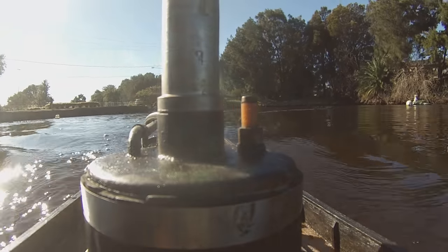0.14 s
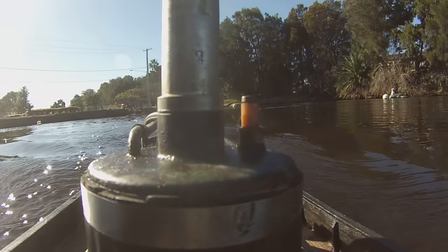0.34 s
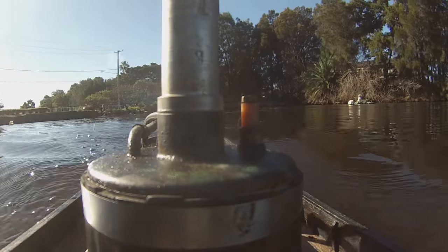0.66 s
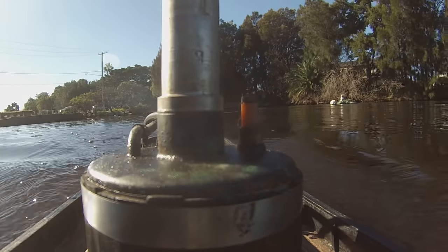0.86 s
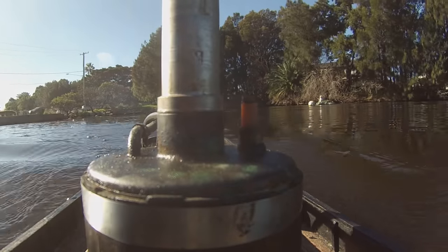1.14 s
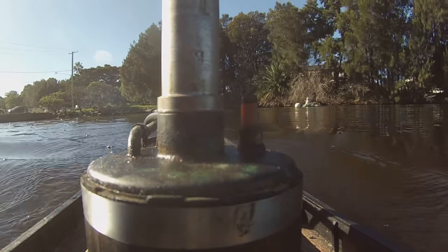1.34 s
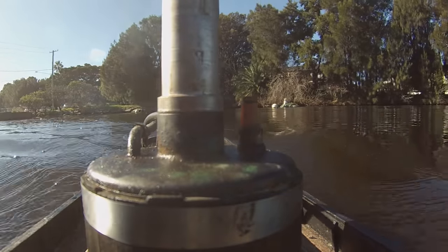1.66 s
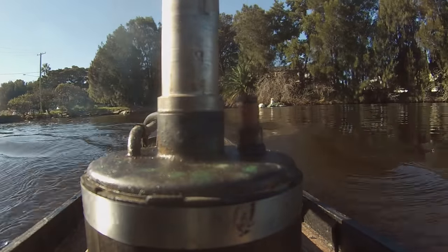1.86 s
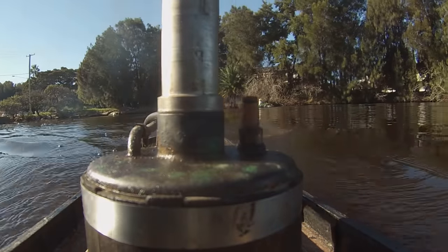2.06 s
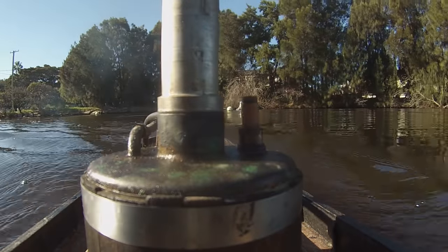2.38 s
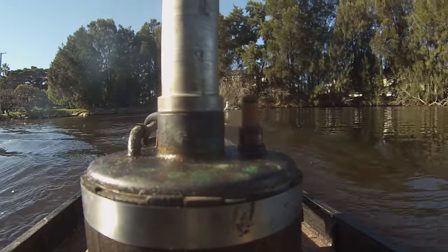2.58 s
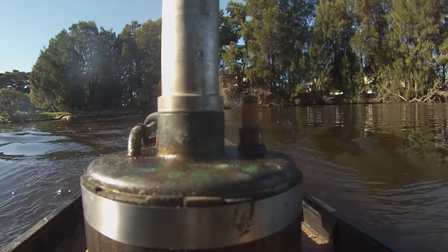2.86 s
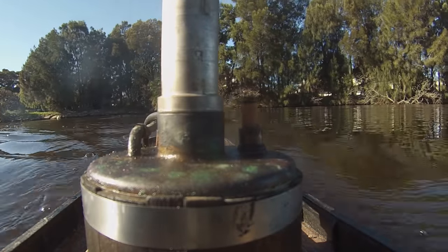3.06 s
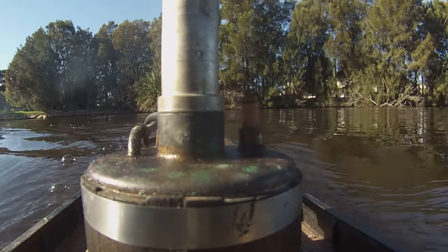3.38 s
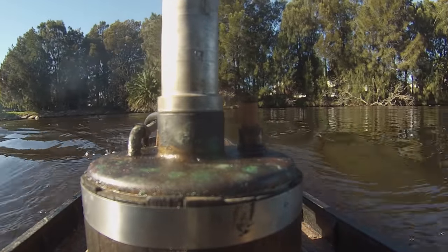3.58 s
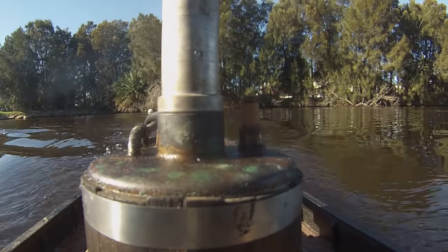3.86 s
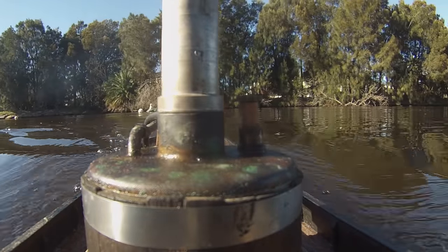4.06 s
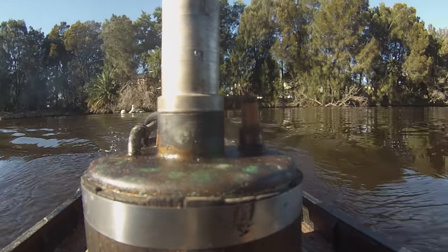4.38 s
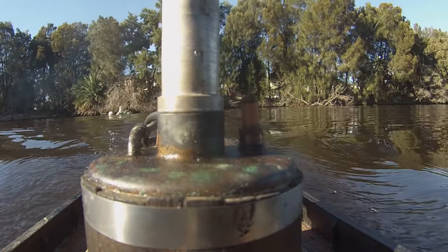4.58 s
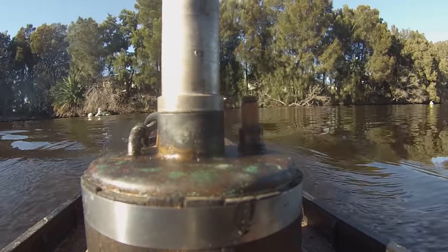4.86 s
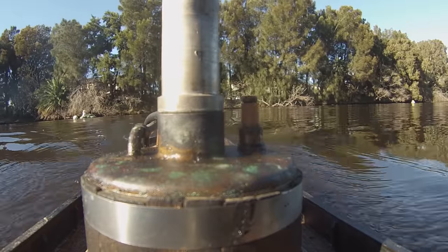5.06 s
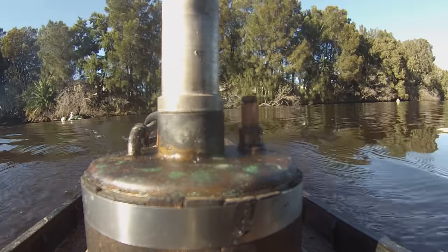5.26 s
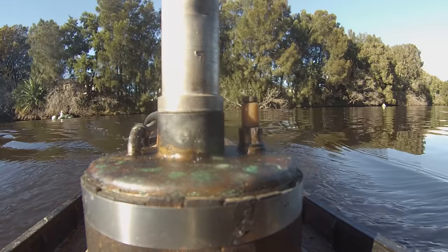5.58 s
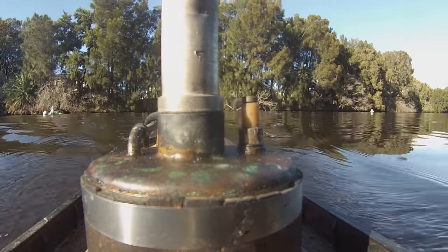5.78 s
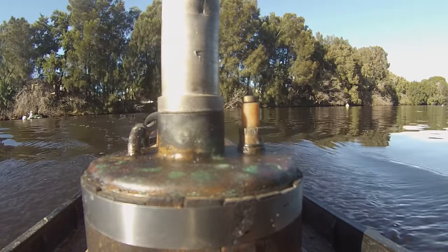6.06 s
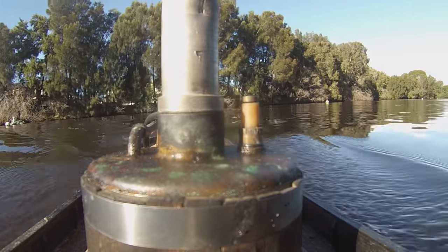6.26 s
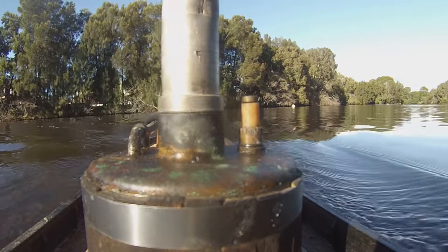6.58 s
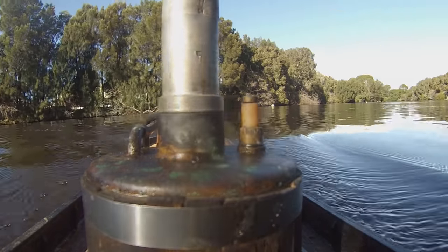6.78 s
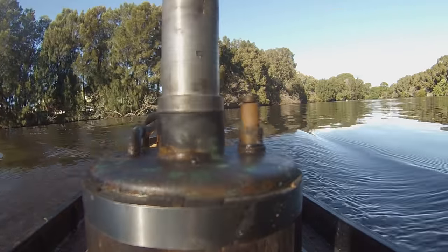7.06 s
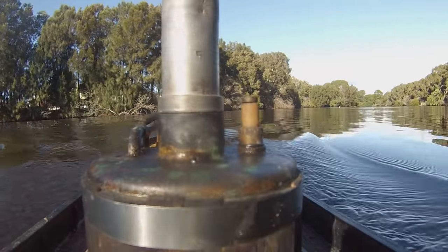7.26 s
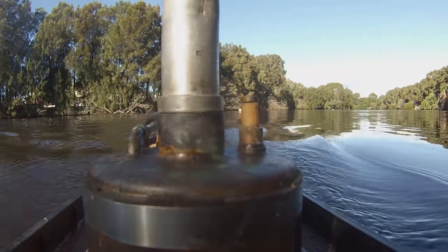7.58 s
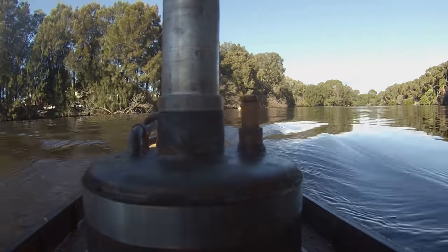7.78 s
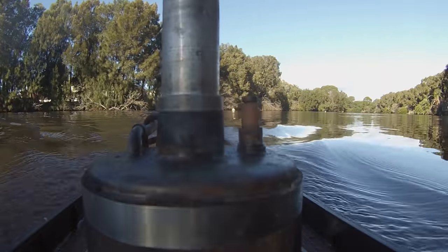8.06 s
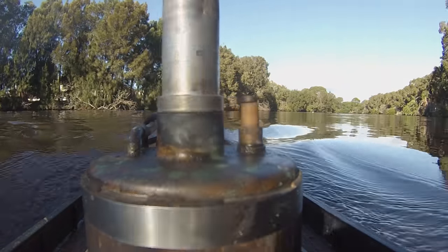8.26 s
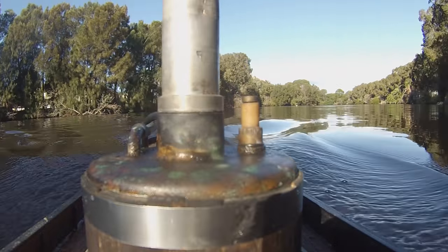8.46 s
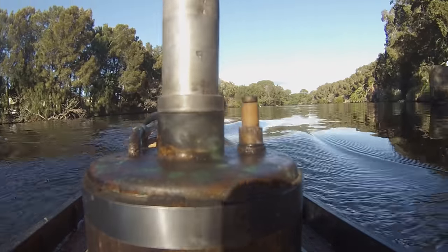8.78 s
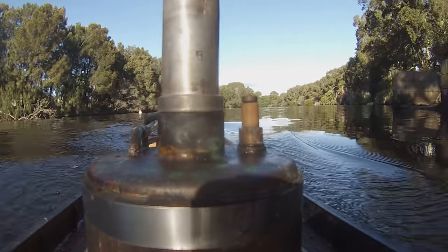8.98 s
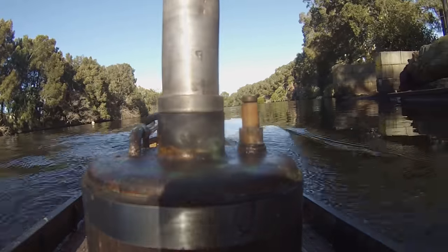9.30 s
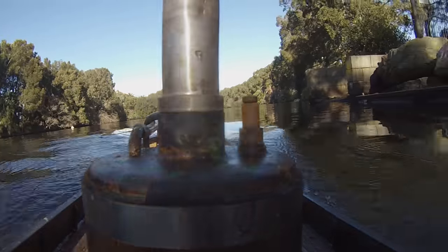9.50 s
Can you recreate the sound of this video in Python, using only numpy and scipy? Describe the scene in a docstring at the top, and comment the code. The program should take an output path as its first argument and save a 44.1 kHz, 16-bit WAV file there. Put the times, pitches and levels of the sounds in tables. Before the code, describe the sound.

Heard through the hull of a model steam boat on a river, the little engine makes a loud, low, even drone from start to finish. The planking, deck and boiler buzz with a fast metallic rattle and a steady ringing whine, over the soft, rapid thumping of a slack bearing. Small knocks come now and then, singly or in clusters, while a faint low rumble of water lies beneath.

```python
"""Aboard a model steam tug.

The microphone is fixed to the boat and hears its small double-acting engine through the structure.
Two strokes a turn shake the hull into a deep hum; steam and rattle, pulsed by the crank, ring
planking, deck and boiler shell. Propeller load slows the crank and swells the hum. A slack bearing
thumps, loose parts knock, and water rumbles along the hull underneath it all."""
import sys
import numpy as np
from scipy import signal
from scipy.io import wavfile
from scipy.ndimage import uniform_filter1d

SR = 44100
rng = np.random.default_rng(int(sys.argv[2]) if len(sys.argv) > 2 else 0)


def transcribe(signal):
    """Save signal, clipped to [-1, 1], as a 16-bit WAV file at the path in sys.argv[1]."""
    frames = np.atleast_2d(signal).T
    limited = np.clip(frames, -1, 1)
    pcm = np.round(limited * 32767).astype(np.int16)
    wavfile.write(sys.argv[1], SR, pcm)


N = 424683

# Load on the propeller. Each row: time in seconds, rise of the hum in dB (0 is even load).
PROPELLER_LOAD = [(0.0, -0.18), (0.35, -2.3), (0.49, -0.5), (0.82, -1.85), (0.98, 0.5), (1.07, -1.22),
                  (2.05, 0.0), (2.55, -0.68), (3.05, -0.9), (3.13, 0.0), (3.9, -0.85), (4.08, 0.2),
                  (4.32, -0.63), (4.85, -0.53), (5.32, 0.5), (5.75, 0.6), (5.9, 1.58), (6.15, -1.55),
                  (6.3, -0.5), (7.2, -0.5), (7.32, 1.8), (7.7, 0.24), (7.82, 1.4), (7.95, 0.5), (8.4, 0.16),
                  (8.9, -1.64), (9.25, -0.96), (9.4, -0.2), (9.63, 0.4)]
# The engine's slow drift at even load. Each row: time in seconds, strokes per second,
# level of the hum's octave in dB.
ENGINE_DRIFT = [(0, 49.28, -32.0), (2, 49.41, -31.3), (4, 49.56, -30.0), (6, 49.77, -28.8),
                (7.2, 49.88, -29.7), (8.2, 49.64, -28.2), (9, 49.78, -29.4), (9.63, 50.83, -31.1)]
# Weaker tones from rod and crank. Each row: multiple of the crank speed, level in dB, polarity,
# wobble in dB, share of the octave's swell.
CRANK_ORDERS = [(1, -42, -1, 2, -0.073), (3, -34, -1, 0.7, 0.76), (5, -37.5, -1, 0.8, 0.11),
                (6, -43, -1, 2, 0.93), (7, -46.5, -1, 1.5, 0.95), (8, -39, -1, 0.87, .25),
                (9, -48, 1, 2, -0.94), (10, -53.5, -1, 3, -0.2), (11, -57.5, -1, 4.5, -0.36)]

# Resonances of the boat's three parts; neighbours of like polarity cancel in a notch between them.
# Each row: frequency in Hz, width in Hz, relative gain in dB, polarity.
PLANKING_MODES = [(305, 69, -3, 1), (342, 79.5, -0.16, -1), (431, 49.3, 0.0, 1), (552, 177, -13, -1),
                  (702, 42, -15.5, -1), (870, 227, -18, 1)]
DECK_MODES = [(983.5, 74.4, -4.5, -1), (1137, 82, -6.5, 1)]
BOILER_MODES = [(1311, 102, -18.6, -1), (1467, 126, -13.2, 1), (1767, 176, -18.5, 1), (1858, 86, -5.4, -1),
                (1945, 45, -16.0, 1), (2033, 60, -12.6, 1), (2220, 124, -21.4, -1), (2455, 90, -30.0, 1),
                (2784, 403, -32.9, 1), (2998, 97, -32.9, 1), (3300, 84, -25.7, -1), (3680, 139, -18.4, 1),
                (4210, 403, -31.5, -1), (4900, 195, -31.7, -1), (5330, 109, -35.6, 1),
                (5850, 244, -27.7, -1), (7000, 960, -38.2, 1), (7800, 641, -38.3, -1),
                (9370, 935, -41.7, 1), (11330, 1334, -47.2, -1), (12870, 1085, -53.1, 1)]
# How the crank pulses each part's rattle. Each holds: quietest crank angle in turns, swing per turn
# in dB, swing per stroke in dB, narrowness of the pause, flicker in dB.
PLANKING_PULSE = (.37, .6, 1.7, .1, 1.1)
DECK_PULSE = (.43, -.2, 3.0, -.25, 1.2)
BOILER_PULSE = (.315, .8, 2.8, .45, .8)

# The loudest knocks of loose parts. Each row: start in seconds, level in dB,
# part struck (0 planking, 1 deck, 2 boiler).
LOOSE_KNOCKS = [(0.161, -22, 1), (1.556, -25, 0), (1.749, -21, 0), (1.829, -21, 2), (1.983, -22, 1),
                (2.023, -19, 1), (2.727, -17, 0), (2.889, -18, 0), (2.974, -20, 1), (3.151, -23, 0),
                (4.135, -18, 1), (4.282, -20, 0), (4.477, -22, 1), (4.839, -17.5, 2), (6.089, -16, 1),
                (6.123, -17.5, 0), (6.165, -23, 2), (6.345, -18, 0), (7.383, -18.5, 1), (7.57, -19, 1),
                (8.139, -18, 1), (8.181, -20, 1), (8.383, -20, 1), (8.637, -24, 0)]
# Water along the hull. Each row: centre in Hz, width of one filter pass in Hz, level in dB.
WATER_BANDS = [(39.7, 10, -43), (65, 51, -46), (124, 91, -47), (196, 126, -48.5)]

HUM_DB, RATTLE_DB = -12, -27.5  # the hum at even load; the rattle before its low cut
MOUNT_HZ, MOUNT_WIDTH_HZ = 192, 27  # the engine mount delays the orders near its resonance


def engine():
    """Load slows the crank and swells the octave. Gives crank angle in turns, load and octave in dB."""
    t = np.arange(N) / SR
    hunting = wander(14)
    hunting -= uniform_filter1d(hunting, SR // 4)  # a slow stroke is soon made up
    load_db = np.interp(t, *np.transpose(PROPELLER_LOAD)) + 0.44 * hunting / hunting.std()
    times, even_hz, even_octave_db = np.transpose(ENGINE_DRIFT)
    stroke_hz = np.interp(t, times, even_hz) - 0.65 * load_db
    turns = 0.096 + np.cumsum(stroke_hz) / (2 * SR)
    labour_db = 1.05 * np.maximum(load_db, 0)  # further swell above even load
    octave_db = np.interp(t, times, even_octave_db) + 1.85 * load_db + labour_db
    return turns, load_db, octave_db


def piston_hum(turns, load_db, octave_db):
    """The piston shakes the hull twice a turn; rod and crank add orders locked to the same turn."""
    angle = 2 * np.pi * turns
    crank_hz = (turns[-1] - turns[0]) * SR / N
    swell_db = octave_db - octave_db.mean()
    hum = undb(HUM_DB + load_db + 0.12 * wander(22)) * np.cos(2 * angle)
    hum -= undb(octave_db + 0.8 * wander(14)) * np.cos(4 * angle)
    for multiple, db, polarity, wobble_db, share in CRANK_ORDERS:
        gain = polarity * undb(db + share * swell_db + wobble_db * wander(5))
        hz = multiple * crank_hz
        mount_lag = 2 * np.arctan2(MOUNT_WIDTH_HZ * hz, MOUNT_HZ ** 2 - hz ** 2)
        phase_wobble = 0.12 * wobble_db * wander(5)
        hum += gain * np.cos(multiple * angle - mount_lag + phase_wobble)
    return np.sqrt(2) * hum


def steam_rattle(turns, pulse, modes):
    """Dense small knocks and steam hiss ring one part of the boat, easing as the piston reverses."""
    quiet_turn, turn_db, stroke_db, narrowness, flicker_db = pulse
    angle = 2 * np.pi * (turns - quiet_turn)
    skew = 0.22 * np.sin(2 * angle) * (1 - np.cos(2 * angle))  # the push sets in faster than it fades
    pause = np.cos(2 * angle) + narrowness * np.cos(4 * angle) - skew
    force_db = -turn_db * np.cos(angle) - stroke_db * pause + flicker_db * wander(160)
    grain_db = 0.92 * rng.exponential(size=N)  # some contacts are much harder than the rest
    force = undb(force_db + grain_db) * rng.standard_normal(N)
    return ring(force / force.std(), modes)


def loose_knocks(spread_db=-10.5):
    """A loose part strikes planking, deck or boiler; the other two ring more faintly."""
    times, blow_db, struck = np.transpose(LOOSE_KNOCKS)
    return sum(blows(times, blow_db + spread_db * (struck != part), modes)
               for part, modes in enumerate((PLANKING_MODES, DECK_MODES, BOILER_MODES)))


def bearing_slap(turns, level_db=-30, scatter_db=0.5):
    """The crank bearing takes up its slack once a turn and thumps the planking."""
    slap_turns = np.arange(1, int(turns[-1])) - 0.1
    times = np.interp(slap_turns, turns, np.arange(N) / SR)
    peaks_db = level_db + scatter_db * rng.standard_normal(len(times))
    return blows(times, peaks_db, PLANKING_MODES)


def water_rumble():
    """Water runs along the hull: low, slowly wavering noise under the hum."""
    rumble = 0
    for hz, width, db in WATER_BANDS:
        peak = signal.iirpeak(hz, hz / width, SR)
        band = signal.lfilter(*peak, rng.standard_normal(N))
        band = signal.lfilter(*peak, band)
        rumble += undb(db + 2.1 * wander(2.95)) * band / band.std()
    return rumble


def blows(times, peaks_db, modes, push_s=0.00039, build_s=0.0025):
    """Short pushes ring one part of the boat; each ring builds as it spreads."""
    push = np.hanning(int(push_s * SR))
    knock = ring(np.pad(push, (0, SR // 20)), modes)
    knock *= 1 - np.exp(-np.arange(len(knock)) / (build_s * SR))
    force = np.zeros(N)
    force[np.clip(times * SR, 0, N - 1).astype(int)] = undb(peaks_db)
    return signal.oaconvolve(force, knock / np.abs(knock).max())[:N]


def ring(force, modes):
    """One force drives damped mass-spring modes, each with its listed gain at its centre."""
    motion = 0
    for hz, width, db, polarity in modes:
        w, damping = np.tan(np.pi * hz / SR), width / hz
        numerator = damping * w ** 2 * np.array([1, 2, 1])
        denominator = [1 + damping * w + w ** 2, 2 * (w ** 2 - 1), 1 - damping * w + w ** 2]
        motion += polarity * undb(db) * signal.lfilter(numerator, denominator, force)
    return motion


def wander(rate_hz):
    """Random levels, each held 1 / rate_hz seconds, smoothed twice and scaled to a spread of 1."""
    hold = int(SR / rate_hz)
    steps = np.repeat(rng.standard_normal(N // hold + 1), hold)
    smooth = uniform_filter1d(uniform_filter1d(steps, hold), hold)[:N]
    return smooth / smooth.std()


def undb(db):
    """Decibels to amplitude."""
    return 10 ** (np.asarray(db) / 20)


def scene():
    """On board, in mono: the engine's hum up front, the ringing panels behind it, water below."""
    turns, load_db, octave_db = engine()
    planking = steam_rattle(turns, PLANKING_PULSE, PLANKING_MODES)
    metal = steam_rattle(turns, DECK_PULSE, DECK_MODES) + steam_rattle(turns, BOILER_PULSE, BOILER_MODES)
    metal *= undb(0.36 * (load_db - load_db.mean()))  # deck and boiler rattle harder under load
    rattle = planking + metal
    panels = undb(RATTLE_DB) * rattle / rattle.std() + bearing_slap(turns) + loose_knocks()
    # panels this small radiate little below their first mode
    panels = signal.sosfilt(signal.butter(2, 200, "high", fs=SR, output="sos"), panels)
    return (piston_hum(turns, load_db, octave_db) + panels + water_rumble())[None]


def record(dry):
    """The recorder cuts the top steeply above 14.1 kHz."""
    return signal.sosfilt(signal.ellip(8, 0.2, 70, 14100, fs=SR, output="sos"), dry)


dry = scene()
out = record(dry)
transcribe(out)
```